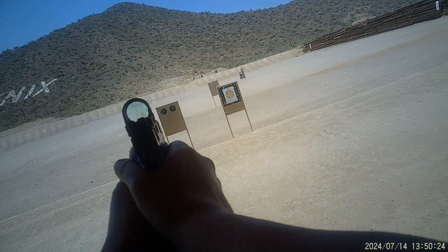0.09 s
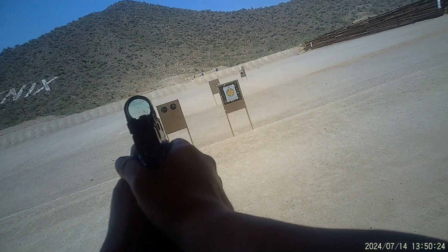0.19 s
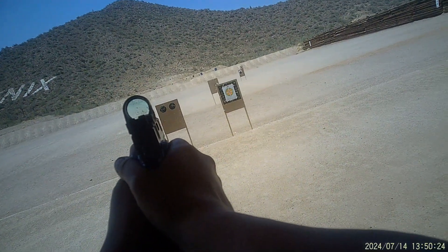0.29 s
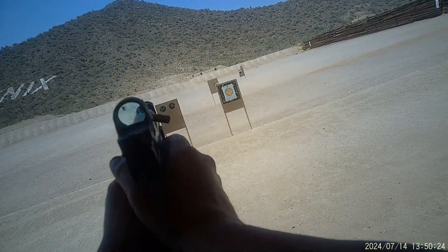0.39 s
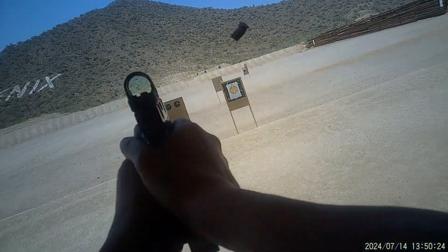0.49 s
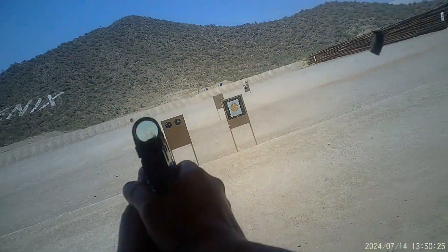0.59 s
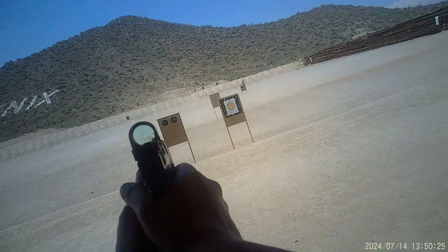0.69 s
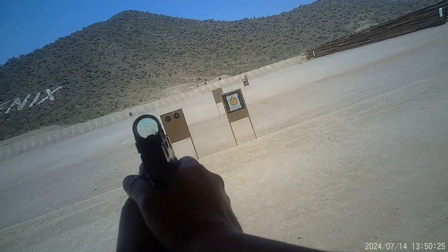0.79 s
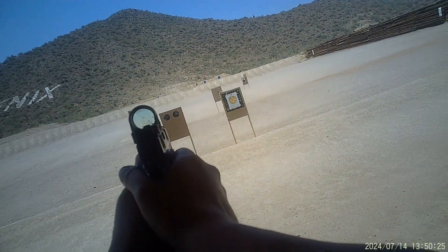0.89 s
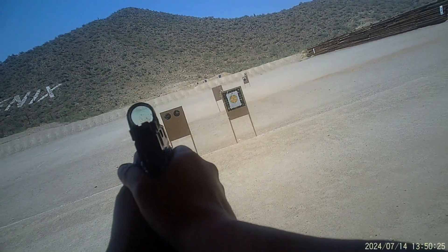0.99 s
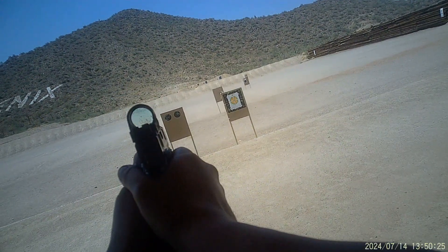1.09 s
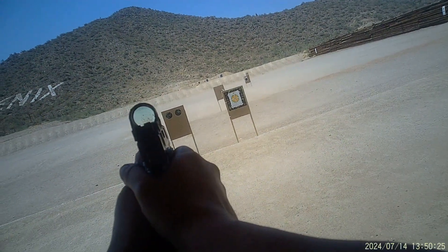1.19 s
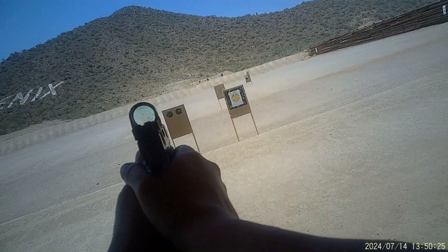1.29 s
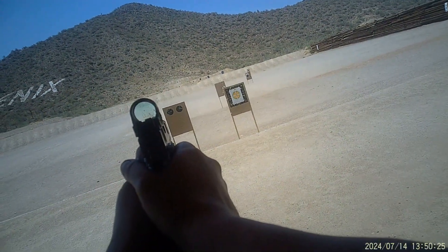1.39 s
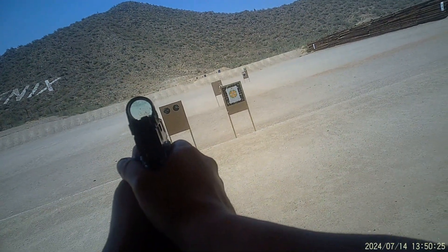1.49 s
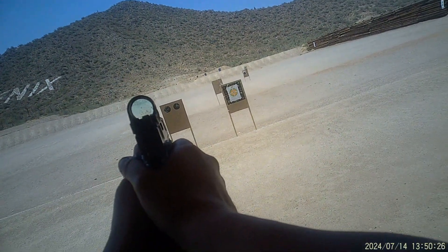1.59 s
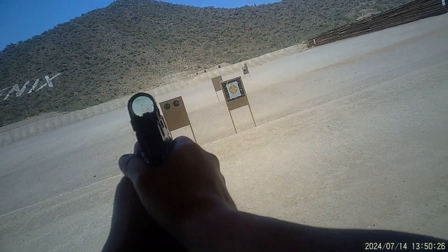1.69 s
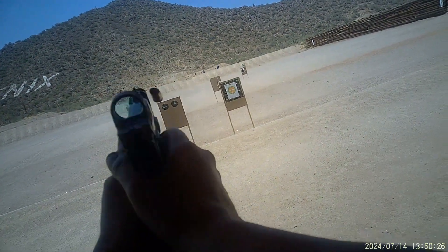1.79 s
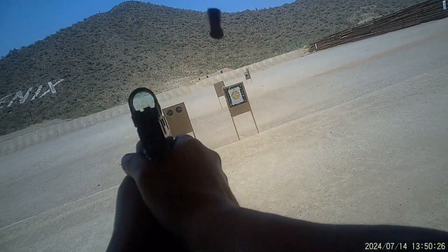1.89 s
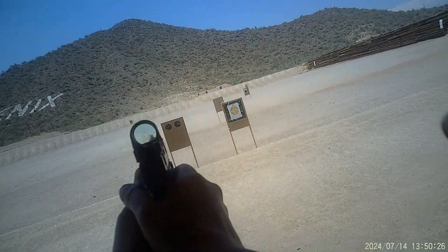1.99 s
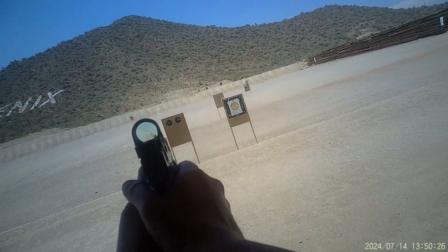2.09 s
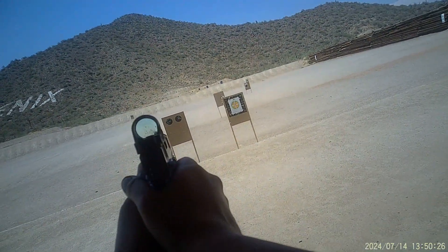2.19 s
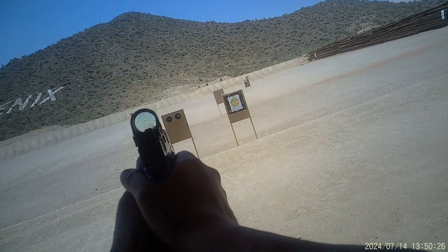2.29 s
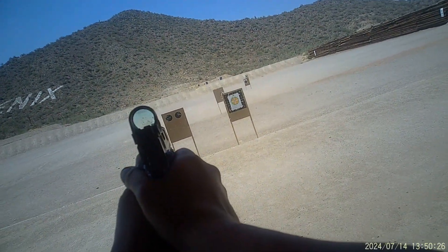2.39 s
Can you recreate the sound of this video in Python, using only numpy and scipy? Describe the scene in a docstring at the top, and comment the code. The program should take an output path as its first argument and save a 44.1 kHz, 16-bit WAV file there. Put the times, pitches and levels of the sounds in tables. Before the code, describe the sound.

A pistol cracks twice in quick succession, echoes slap back and fade, spent cases and gear tick with a faint metal ring, something hollow knocks, then two more shots; close, distorted small microphone outdoors.

```python
"""Two pairs of pistol shots

Dry outdoor range, two quick pairs of shots, heard by a small microphone at the shooter that overloads.
Each blast is a pressure pulse with a bright crack and a low push, then dense noise scattered off ground and berms;
slap echoes ring as short tones, filtered noise rolls back from the hills and a low note follows each shot.
Spent cases and gear tick, thin metal tones swell and something hollow is knocked, over a faint noise floor."""
import sys
import numpy as np
from scipy import signal
from scipy.io import wavfile

SR = 44100
rng = np.random.default_rng(int(sys.argv[2]) if len(sys.argv) > 2 else 0)


def boost_factor(decibels):
    """Convert a level in decibels to a linear amplitude factor."""
    exponent = np.asarray(decibels, float) / 20
    return 10 ** exponent


def store_wav(level_fs):
    """Save 16-bit WAV to argv[1]."""
    pcm = np.round(np.clip(np.atleast_2d(level_fs), -1, 1) * 32767)
    wavfile.write(sys.argv[1], SR, pcm.T.astype(np.int16))


N = 105840  # 2.4 s

# the four shots: t/s, blast level/dB into the microphone, scatter t60/s, hill roll level/dB, crack re blast/dB
SHOTS = [(0.2146, 10, 0.086, -14.5, -6), (0.4932, 22.5, .14, -12.5, 6), (1.8732, 19, 0.11, -14.5, 8.5),
         (2.0881, 10.5, 0.072, -19.5, -8)]


def rms_one(x):
    """Scale to rms 1."""
    return x / np.sqrt(np.mean(x ** 2) + 1e-20)


def drift(rate):
    """Slow chance with spread 1: noise through two equal low-passes at rate (Hz), made at every 40th sample."""
    r = np.exp(-80 * np.pi * rate / SR)
    slow = signal.lfilter([1], [1, -2 * r, r * r], rng.standard_normal(N // 40 + 2002))
    slow = rms_one(slow[2000:])  # the filter has settled
    return np.interp(np.arange(N) / 40, np.arange(len(slow)), slow)


def ring(s, db, hz, t60):
    """A click at s sets a sine ringing; it loses 60 dB in t60 seconds."""
    t = np.maximum(np.arange(N) / SR - s, 0)
    return boost_factor(db - 60 * np.minimum(t / t60, 5)) * np.sin(2 * np.pi * hz * t)


def dying(s, t60):
    """Envelope that starts at s and loses 60 dB in t60 seconds."""
    t = np.arange(N) / SR - s
    return (t >= 0) * boost_factor(-60 * np.clip(t / t60, 0, 5))


def swell(s, rise, t60):
    """Dying envelope with a soft rise (time constant in s)."""
    return dying(s, t60) * (1 - dying(s, 7 * rise)) ** 2


def hiss(hz):
    """Noise an octave wide around hz, rms 1."""
    octave = signal.butter(4, [hz / 1.4, hz * 1.4], "band", fs=SR, output="sos")
    return rms_one(signal.sosfilt(octave, rng.standard_normal(N)))


def bands(spectrum, lumps_db, lump_rate):
    """Half-octave noise bands with own level and lumps; together rms 1. Returns centres and bands."""
    edges = 25 * 2 ** np.arange(0, 9.1, .5)
    white = rng.standard_normal((2, N))  # neighbouring bands take turns
    together = drift(lump_rate)
    centres = np.sqrt(edges[1:] * edges[:-1])
    at, db = np.transpose(spectrum)
    out = []
    for k, hz in enumerate(centres):
        band = signal.butter(2, edges[k:k + 2], "band", fs=SR, output="sos")
        lumps = lumps_db * (1.18 * together + 0.6 * drift(lump_rate))
        level = np.interp(np.log(hz), np.log(at), db) + lumps
        out.append(signal.sosfilt(band, white[k % 2]) * boost_factor(level))
    out = np.array(out)
    return centres, out / np.sqrt(np.mean(out.sum(0) ** 2))


def air():
    """Outdoor floor: uneven shaped noise, with a light rustle of band noise at first."""
    # spectrum of the floor before scaling: f/Hz, relative level/dB
    floor_spectrum = [(15, -30), (25, -4), (213, -15.5), (235, -12.5), (730, -10), (1190, -20),
                      (1290, -20.5), (2000, -35.5), (7570, -34.5), (9000, -53), (11700, -79.5),
                      (19800, -120)]
    floor_db, rustle_db, rustle_end_s = -55, -67, 0.23
    t = np.arange(N) / SR
    rustle_band = signal.butter(1, [1000, 3900], "band", fs=SR, output="sos")
    rustle = rms_one(signal.sosfilt(rustle_band, rng.standard_normal(N)))
    rustle = rustle * boost_factor(rustle_db + 3.0 * drift(40.0))
    rustle = rustle / (1 + np.exp(np.clip((t - rustle_end_s) / .02, -50, 50)))
    return boost_factor(floor_db) * bands(floor_spectrum, 2.7, lump_rate=9.8)[1].sum(0) + rustle


def ticks():
    """Spent cases and gear in small hard contacts: a short low ring and a bright rasp."""
    # contacts: t/s, level/dB (low ring 4.5 dB up on it), low pitch f/Hz, rasp re level/dB, rasp t60/s
    contacts = [(0.045, -48, 1460, 1, 0.018), (0.067, -49, 1260, 0.5, 0.033), (0.077, -39, 1300, -10, 0.02),
                (1.013, -31, 650, -33, .02), (1.031, -34, 594, -28, 0.022), (1.044, -26.5, 1120, 6, 0.019),
                (1.054, -36.5, 580, -6, 0.087), (1.148, -33, 1060, -32, 0.018),
                (1.209, -28, 1470, -12.5, 0.011), (1.238, -33.5, 1340, -1.5, 0.019),
                (1.253, -34, 1400, -6, 0.03), (1.279, -45.5, 980, 0, 0.027)]
    ring_cycles = 9.6  # cycles to lose 60 dB
    t, bright = np.arange(N) / SR, hiss(3260)
    out = 0
    for s, db, hz, bright_db, t60 in contacts:
        low = boost_factor(db + 4.5) * swell(s, 0.00021, ring_cycles / hz) * np.sin(2 * np.pi * hz * (t - s))
        rasp = boost_factor(db + bright_db) * swell(s, 0.00072, t60) * bright
        out = out + low + rasp
    return out


def blasts():
    """An N-shaped pulse, bright crack and low push, then scatter off ground and berms, dying faster in the treble."""
    # spectrum of the scatter before scaling: f/Hz, relative level/dB
    scatter_spectrum = [(18, -43.5), (30, -27.5), (53, -14.5), (217, -10.5), (513, -7.5), (889, -4),
                        (1330, -6), (2100, -18.5), (3810, -18), (7090, -36), (9000, -60.5), (11700, -85.5),
                        (19800, -120)]
    pulse_s, pulse_db = .0012, 2  # length, level re blast
    crack_t60_s = .018
    punch_db, punch_hz, punch_t60_s = -3, 160.4, .09  # the same for every shot
    bass_lingers = 0.088  # exponent of t60 against pitch
    t, crack = np.arange(N) / SR, hiss(3740)
    centres, noise = bands(scatter_spectrum, 3, lump_rate=76.0)
    out = 0
    for s, db, t60, _, crack_db in SHOTS:
        phase = (t - s) / pulse_s
        pulse = -boost_factor(db + pulse_db) * (1 - 2 * phase) * (phase >= 0) * (phase < 1)
        edge = boost_factor(db + crack_db) * crack * dying(s, crack_t60_s)
        punch = ring(s, punch_db, punch_hz, punch_t60_s)
        scatter = sum(b * dying(s, t60 * (f / 1000) ** -bass_lingers) for f, b in zip(centres, noise))
        out = out + pulse + edge + punch + boost_factor(db) * scatter
    return out


def hill_roll():
    """Noise of each shot rolling back from near and far slopes; the powers of all rolls add."""
    # spectrum of the roll before scaling: f/Hz, relative level/dB
    roll_spectrum = [(18, -49), (30, -19), (239, -8), (276, -9.5), (342, -7.5), (490, -6.5), (1080, -2),
                     (2100, -19.5), (3900, -20.5), (6760, -40), (9000, -62.5), (11700, -85.5),
                     (19800, -120)]
    rise_s, near_t60_s = 0.014, 0.71
    far_db, far_t60_s = -15, 1.86  # level re near slope
    power = 0
    for s, _, _, db, _ in SHOTS:
        near = dying(s, near_t60_s) ** 2
        far = boost_factor(2 * far_db) * dying(s, far_t60_s) ** 2
        power = power + boost_factor(2 * db) * (1 - dying(s, rise_s)) ** 2 * (near + far)
    return np.sqrt(power) * bands(roll_spectrum, 1, lump_rate=30.0)[1].sum(0)


def boom():
    """A low steady note after each shot that sinks and then stops, its level wavering."""
    boom_db, boom_hz, hold_s, t60_s = -29.5, 120, 0.16, 0.6
    out = 0
    for s, *_ in SHOTS:
        t = np.maximum(np.arange(N) / SR - s, 0)
        envelope = swell(s, 0.012, t60_s) * np.exp(-(t / hold_s) ** 6)
        out = out + boost_factor(boom_db) * envelope * np.sin(2 * np.pi * boom_hz * t)
    return out * boost_factor(2.0 * drift(14.0))


def slaps():
    """Single echoes: a few dull cycles over a lower body that swell and die, with a short bright edge."""
    # echoes: t/s, level/dB (dull tone 8 dB up on it), pitch f/Hz, bright edge re level/dB
    echoes = [(0.26, 5.5, 1465, -17.5), (0.289, -11, 1140, -9), (0.324, -11, 1030, -9),
              (.353, -21, 1050, 2.5), (.417, -10, 1150, -12), (0.452, -7.5, 1225, -18),
              (0.464, -20.5, 620, -20), (0.481, -15.5, 1160, -10), (.555, 3, 823, -12),
              (0.585, 0.5, 863, -8), (0.616, -11.5, 1060, -16.5), (0.677, -19.5, 690, -29),
              (.739, -2.5, 1230, -26), (.769, -23, 500, -8.5), (.805, -18, 799, -32),
              (1.935, 2.5, 808.5, -6.5), (1.963, -7, 830, -10), (2.057, -18, 1070, -29),
              (2.117, -17.5, 950, 2.5), (2.133, -5.5, 830, -8), (2.161, -10.5, 910, -11.5),
              (2.203, -18.5, 848, -6.5), (2.233, -18.5, 956, -14), (2.244, -33, 870, 6.5),
              (2.291, -13, 990, -9.5), (2.338, -19, 680, -22), (2.366, -27, 630, -9)]
    rise_s, cycles = 0.00054, 10.75  # cycles to lose 60 dB
    body_db, body_ratio = -8.5, .55  # level and pitch re dull tone
    t, bright = np.arange(N) / SR, hiss(3200)
    out = 0
    for s, db, hz, treble_db in echoes:
        tone = np.sin(2 * np.pi * hz * (t - s))
        body = boost_factor(body_db) * np.sin(2 * np.pi * body_ratio * hz * (t - s))
        dull = boost_factor(db + 8) * swell(s, rise_s, cycles / hz) * (tone + body)
        edge = boost_factor(db + treble_db) * swell(s, 0.00039, 0.018) * bright
        out = out + dull + edge
    return out


def metal():
    """Thin metal rings: sines that swell unevenly and fade."""
    # tones: f/Hz, level/dB rms at the height of the swell, t/s of that height
    tones = [(3020, -59, 1.35), (3871, -63, 1.28), (4317, -67, 1.28), (4893, -72, 1.27), (5265, -78, 1.26),
             (6223, -75, 1.27), (2374, -76, 1.28)]
    rise_s, fall_s = .055, .085
    t = np.arange(N) / SR
    out = 0
    for hz, db, s in tones:
        envelope = np.exp(-.5 * ((t - s) / np.where(t < s, rise_s, fall_s)) ** 2)
        level = np.sqrt(2) * boost_factor(db + 1.5 * drift(14.0))
        out = out + level * np.sin(2 * np.pi * hz * t) * envelope
    return out


def knock():
    """Something hollow is knocked: a few resonances ring under a rasp of band noise."""
    # resonances: f/Hz, level re knock/dB, t60/s
    modes = [(1077, 3, 0.12), (1430, -2.5, 0.071), (1680, -8, 0.14), (2410, -15, .05)]
    s, knock_db = 1.4215, -34.5
    rasp_db, rasp_t60_s = -15.5, 0.13  # level re knock
    rasp = boost_factor(knock_db + rasp_db) * swell(s, 0.00081, rasp_t60_s) * hiss(3330)
    hollow = sum(ring(s, knock_db + db, hz, t60) for hz, db, t60 in modes)
    return rasp + (1 - dying(s, 0.0069)) * hollow


def scene():
    """Shots with their echoes, thinned in the bass, with the low notes, small metal sounds and the floor."""
    rumble_cut = signal.butter(5, 100, "high", fs=SR, output="sos")
    shots = signal.sosfilt(rumble_cut, blasts() + hill_roll() + slaps())
    return (shots + boom() + ticks() + metal() + knock() + air())[None]


def band_limit(x):
    """A steep low-pass at the top of the band."""
    return signal.sosfilt(signal.butter(12, 9250, fs=SR, output="sos"), x)


def record(dry):
    """The microphone input overloads, bass and top are cut, the treble drops out now and then."""
    # treble dropouts: from t/s, to t/s
    treble_gaps = [(.19, .243), (.443, .498), (.70, .757), (1.02, 1.075), (1.402, 1.458), (1.86, 1.907),
                   (2.041, 2.099)]
    ceiling, knee = 0.55, 7.0  # a higher knee bends more sharply
    x = dry / (1 + np.abs(dry / ceiling) ** knee) ** (1 / knee)
    x = signal.sosfilt(signal.butter(1, 28, "high", fs=SR, output="sos"), x)
    x = signal.sosfilt(signal.butter(2, 8300, fs=SR, output="sos"), x)
    x = signal.sosfilt(signal.cheby2(12, 60, 9300, fs=SR, output="sos"), x)
    # zero-phase split, so that low and treble add up again
    low = signal.sosfiltfilt(signal.ellip(7, .1, 35, 4322, fs=SR, output="sos"), x)
    treble = x - low
    t = np.arange(N) / SR
    gap = sum(np.clip(np.minimum(t - a, b - t) / .005 + 1, 0, 1) for a, b in treble_gaps)  # 5 ms ramps
    return band_limit(low + (1 - gap) * treble)


dry = scene()
out = record(dry)
store_wav(out)
```